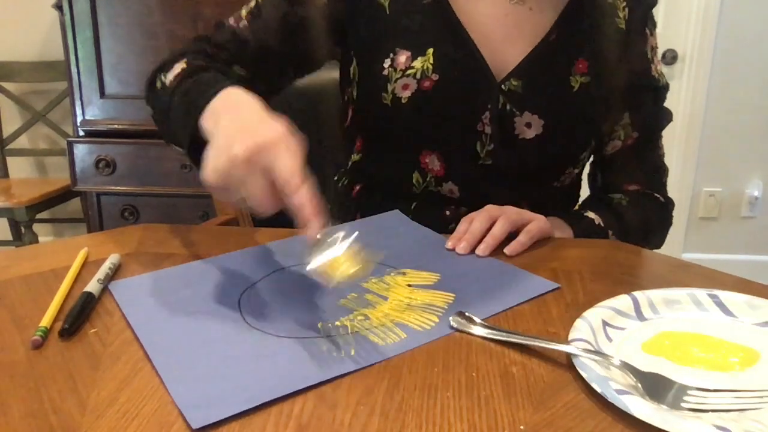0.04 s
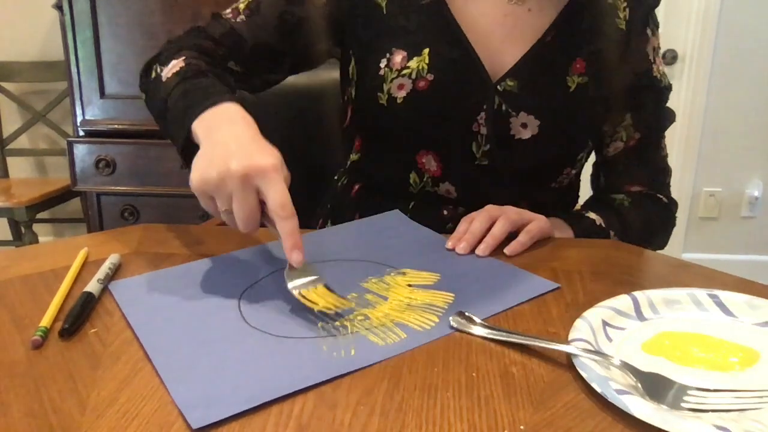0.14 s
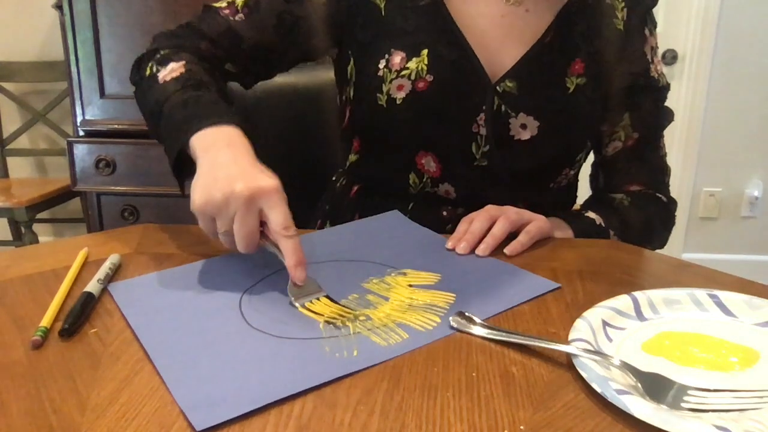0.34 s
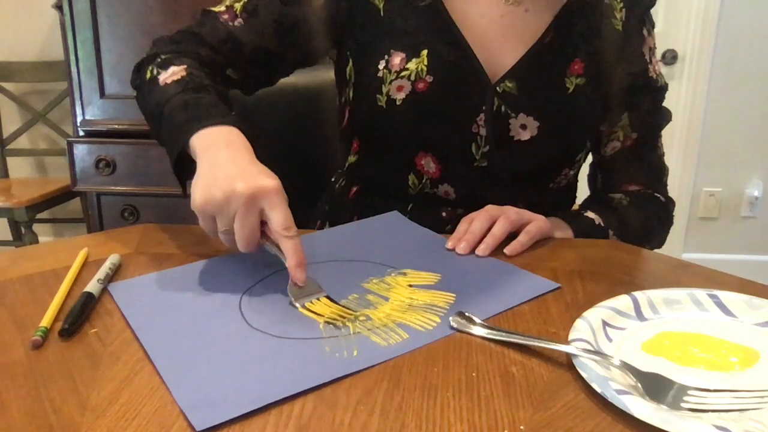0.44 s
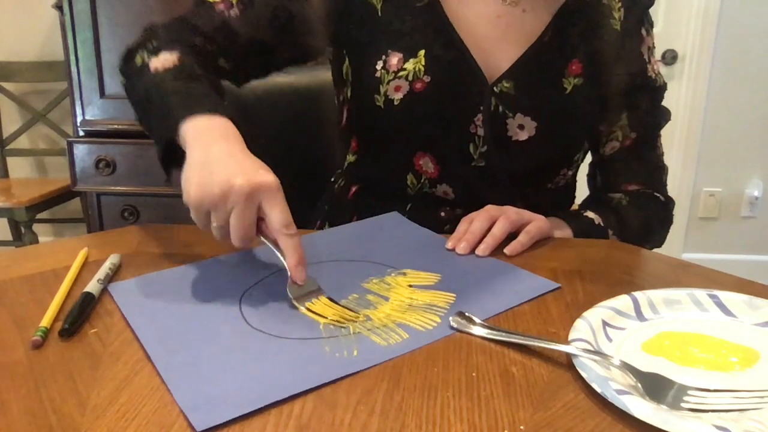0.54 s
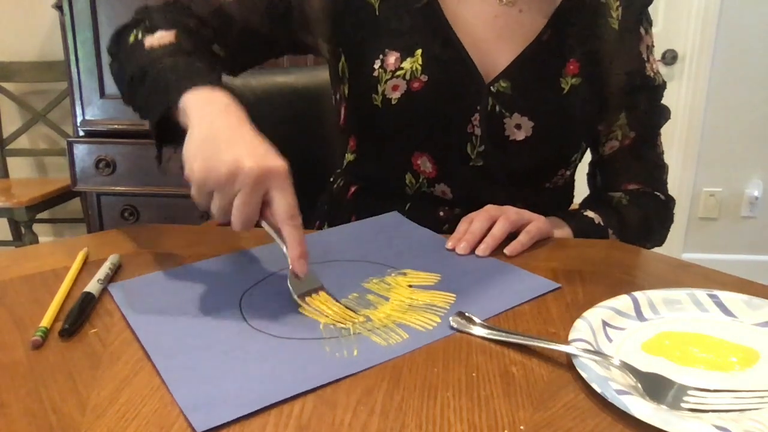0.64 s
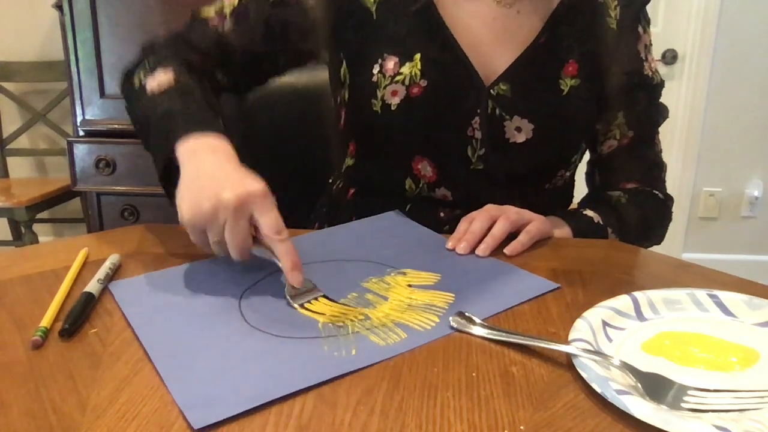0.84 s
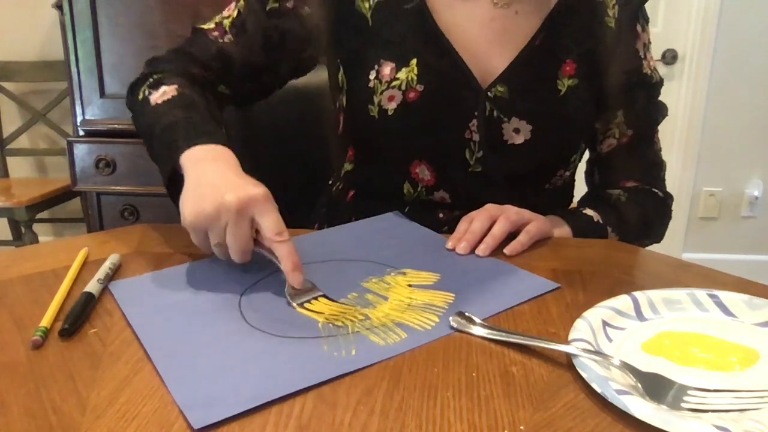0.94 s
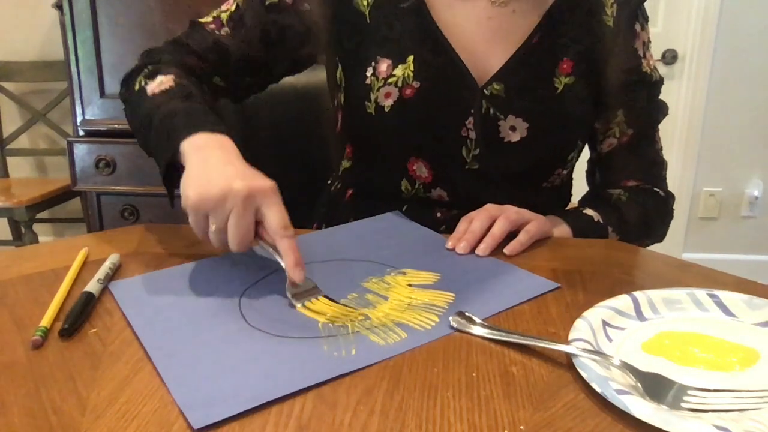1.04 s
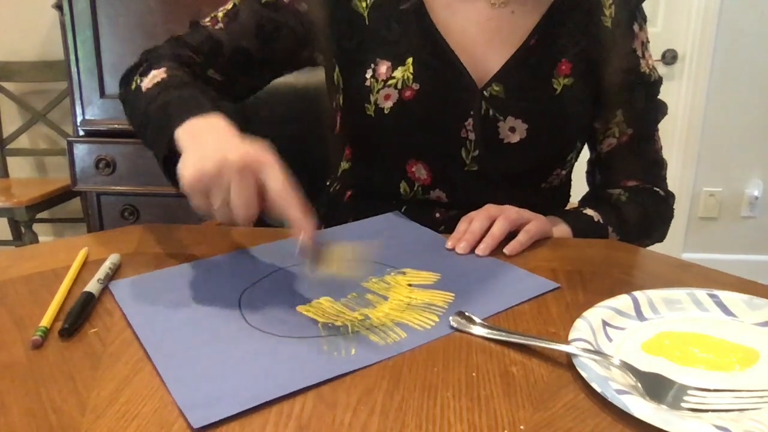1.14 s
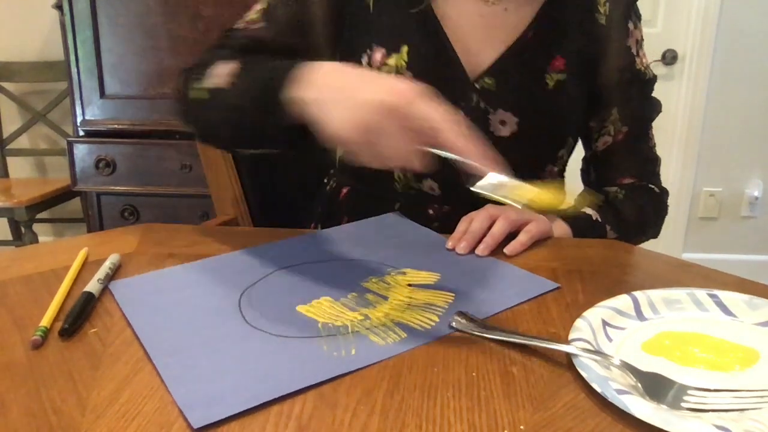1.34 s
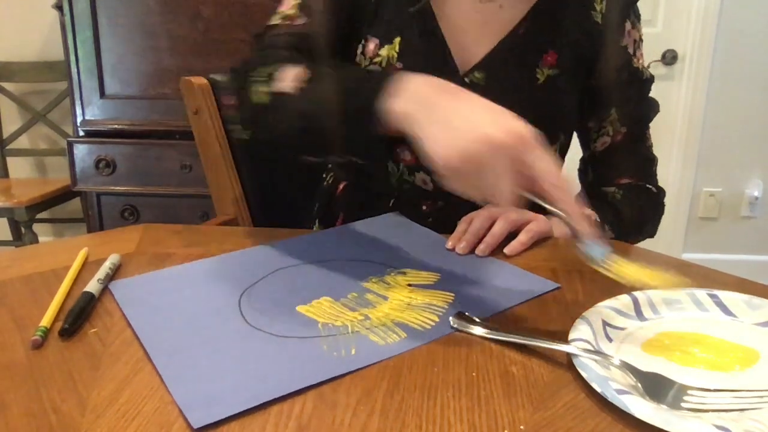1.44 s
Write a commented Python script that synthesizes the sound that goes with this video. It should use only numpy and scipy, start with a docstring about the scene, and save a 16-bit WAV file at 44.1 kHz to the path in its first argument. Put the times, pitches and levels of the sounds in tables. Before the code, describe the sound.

One dull knock sounds as a paint-covered fork is stamped onto paper on a wooden table, followed by very faint sticky crackles. It is heard up close in a small room with ventilation rumbling softly.

```python
"""A small room with a low ventilation rumble, one microphone close to a wooden table.
A fork loaded with paint is stamped once onto paper: fork and table top ring with a dull knock
and a weaker rebound. The fork is then rocked twice and lifted, and the wet paint and paper
crackle faintly under the tines. The near walls answer briefly."""
import sys
import numpy as np
from scipy import signal
from scipy.fft import rfft, irfft, next_fast_len
from scipy.io import wavfile

SR = 44100
rng = np.random.default_rng(int(sys.argv[2]) if len(sys.argv) > 2 else 0)


def generate_wav(sig):
    """Save sig (samples, or channels by samples) to the path in sys.argv[1] as 16-bit PCM at SR."""
    pcm = np.round(np.clip(np.atleast_2d(sig).T, -1, 1) * 32767).astype(np.int16)
    wavfile.write(sys.argv[1], SR, pcm)


N = 66150

# spectrum of the ventilation's rumble and air: f/Hz, level/dB
AIR_SPECTRUM = [(20, -18), (35, -11), (55, -1.5), (85, -2.5), (125, 4), (165, -0.5), (225, 0), (300, -3.5),
                (400, -6.5), (520, -13.5), (700, -15.5), (1050, -18.5), (1750, -25.5), (2300, -38),
                (2900, -42.5), (3800, -50.5), (9000, -51.5), (15000, -46)]
# spectrum of the faint upper hiss: f/Hz, level/dB
HISS_SPECTRUM = [(500, -38), (1400, -0.5), (2100, 1.5), (2600, -6.5), (3300, -23.5), (9000, -27),
                 (15000, -22)]
# that hiss comes and goes: t/s, level/dB
HISS_DRIFT = [(0, -85.5), (.2, -89.5), (.45, -88), (.8, -84.5), (1.0, -99.5), (1.3, -98.5), (1.45, -87)]
# decay of the room's tail: f/Hz, t60/s
ROOM_DECAY = [(100, 0.16), (500, 0.35), (2000, 0.42), (6000, 0.15), (15000, 0.18)]
# colour of that tail: f/Hz, gain/dB
TAIL_COLOUR = [(100, 6), (500, 1.5), (1200, 1), (1900, -8.5), (3500, 3.5), (15000, 0)]

# tines slipping over the paper: centre t/s, half-width/s, level/dB
TINE_SLIPS = [(0.821, 0.02, -70.5), (1.083, 0.019, -73.5)]
# spectrum of their scrape: f/Hz, level/dB
SCRAPE_SPECTRUM = [(100, -20), (420, 5), (1000, -9.5), (1800, -4), (2800, -19.5), (4200, -25),
                   (5200, -13.5), (6500, -25), (15000, -24)]
# spectrum of paint squeezed under the fork: f/Hz, level/dB
FIZZ_SPECTRUM = [(1000, -35), (8000, -24), (11500, -6), (15000, 2.5)]
# paint peeling as the fork moves: t/s, attack/s, hold/s, release t60/s, level/dB, tilt/(dB per octave)
PAINT_PEELS = [(0.578, 0.031, 0.042, 0.13, -70.5, 1.5), (0.785, 0.023, 0.056, 0.14, -74.5, 1),
               (1.057, 0.0062, 0.0098, 0.12, -64.5, 1.5)]
# spectrum of the crackle before the tilt: f/Hz, level/dB
CRACKLE_SPECTRUM = [(500, -28), (2000, -9), (3800, -16), (5000, -11.5), (8000, -2.5), (11000, 3),
                    (15000, 1)]
# single threads of paint snapping: t/s, level/dB
THREAD_SNAPS = [(.523, -67), (.593, -48), (0.5946, -59), (0.824, -57), (.907, -65), (1.064, -59.5),
                (1.077, -57)]
# spectrum of a snap: f/Hz, level/dB
SNAP_SPECTRUM = [(1000, -42), (5000, -24), (9000, 0), (13000, 9), (15500, 9)]

# spectrum of the tines meeting the paint just before the wood: f/Hz, level/dB
TOUCH_SPECTRUM = [(100, -20), (500, -20), (1100, -12), (1900, -1.5), (2500, -11.5), (3100, -33),
                  (5000, -49), (15000, -55)]
# spectrum of the paper under the blow: f/Hz, level/dB
SCUFF_SPECTRUM = [(300, -10), (2000, 12.5), (4000, -14), (8000, -18.5), (15000, -14.5)]
# the fork's blow and rebound: t/s, level/dB, contact time/s
FORK_BLOWS = [(0.2196, 1, 0.00048), (0.2307, -8.5, 0.0011)]
# modes of fork and table top, damped by hand and paper: f/Hz, relative level/dB, t60/s
KNOCK_MODES = [(162.3, -28.5, 0.046), (248, -27.5, 0.046), (346, -32.5, 0.021), (431, -23.5, 0.014),
               (722, -40, 0.039), (832, -39, 0.023), (946, -39, 0.023), (1385, -51, 0.02),
               (1506, -35, 0.014), (1810, -25, 0.014), (2030, -39.5, 0.024), (2390, -44, 0.018)]
# how well the cushioned table top radiates: f/Hz, gain/dB
TOP_RADIATION = [(30, -27.5), (104, -29.5), (132, -0.5), (600, 3), (1020, 1.5), (1130, -11), (1330, 1),
                 (1420, -11), (1520, 3.5), (2100, 1), (2600, -4), (2900, -19), (3500, -4), (5000, -32.5),
                 (15000, -52)]
# long ring of the whole table: f/Hz, relative peak level/dB, t60/s, build-up/s
TABLE_MODES = [(47, -51, .14, .08), (231, -43, 0.15, 0.029), (273.7, -51, 0.082, 0.055),
               (506.6, -59.5, 0.067, .015), (529.3, -60, 0.17, 0.069)]


def amp(db):
    return 10 ** (np.asarray(db) / 20)


def unit(x):
    return x / np.sqrt(np.mean(x ** 2) + 1e-20)


def along(points, hz):
    """Read (f/Hz, value) points on a log frequency axis."""
    freqs, values = np.transpose(points)
    return np.interp(np.log(hz + 1), np.log(freqs + 1), values)


def since(start):
    """Seconds after a moment, for each sample."""
    return np.arange(N) / SR - start


def fade(t, t60):
    """Exponential decay from t = 0, silent before."""
    return (t >= 0) * np.exp(-np.log(1000) * np.maximum(t, 0) / t60)


def swell(centre_s, half_width_s, db):
    """A bell-shaped rise and fall."""
    return amp(db) * np.exp(-(since(centre_s) / half_width_s) ** 2)


def mode(hz, db, t60):
    """One damped vibration."""
    t = since(0)
    return amp(db) * fade(t, t60) * np.sin(2 * np.pi * hz * t)


def filtered(x, response):
    """Multiply the spectrum of x by a function of frequency."""
    size = next_fast_len(N + SR // 2)
    return irfft(rfft(x, size) * response(np.fft.rfftfreq(size, 1 / SR)), size)[:N]


def coloured(x, gains):
    """A causal, minimum-phase filter through (f/Hz, gain/dB) points."""
    size = next_fast_len(N + SR // 2)
    gain = amp(along(gains, np.fft.rfftfreq(size, 1 / SR)))
    cepstrum = irfft(np.log(gain), size)
    cepstrum[1:] *= 2 * (np.arange(1, size) < size // 2)
    return filtered(x, lambda hz: np.exp(rfft(cepstrum)))


def noise(spectrum):
    """Coloured noise of rms 1."""
    return unit(filtered(rng.standard_normal(N), lambda hz: amp(along(spectrum, hz))))


def band(hz, width_hz):
    """Narrow noise of rms 1 around one frequency."""
    return unit(filtered(rng.standard_normal(N), lambda f: np.exp(-((f - hz) / width_hz) ** 2)))


def ventilation(air_db=-63, hum_db=-69.5):
    """Room tone: steady rumble and air, with an unsteady low hum and a drifting upper hiss."""
    hiss_db = np.interp(since(0), *np.transpose(HISS_DRIFT))
    hiss = amp(hiss_db) * noise(HISS_SPECTRUM)
    air = amp(air_db) * noise(AIR_SPECTRUM)
    hum = amp(hum_db) * band(hz=61, width_hz=2.2)
    return air + hum + hiss


def room(direct, tail_db, walls_db=-23.5, first_s=0.004, spread_s=0.016, echoes=10):
    """The direct sound reaches the microphone first, then the near walls and a short diffuse tail."""
    hz, t, spectra = signal.stft(rng.standard_normal(SR // 2), SR, nperseg=256)
    colour = amp(along(TAIL_COLOUR, hz))[:, None]
    decay = fade(t, along(ROOM_DECAY, hz)[:, None])
    tail = signal.istft(spectra * colour * decay, SR, nperseg=256)[1]
    tail *= np.clip(np.arange(len(tail)) / SR / first_s - 1, 0, 1)  # fades in after first_s
    response = amp(tail_db) * tail / np.linalg.norm(tail)
    for lateness, polarity in rng.random((echoes, 2)):
        delay = int((first_s + lateness * spread_s) * SR)
        response[delay] += amp(walls_db) * np.sign(polarity - 0.5) / np.sqrt(echoes)
    return direct + signal.fftconvolve(direct, response)[:N]


def tines(zing_db=-77, lift_s=1.066):
    """The pressed fork squeezes the paint, scrapes briefly when it slips and zings as it is lifted."""
    scrape = noise(SCRAPE_SPECTRUM) * sum(swell(*slip) for slip in TINE_SLIPS)
    fizz = noise(FIZZ_SPECTRUM) * swell(centre_s=0.74, half_width_s=0.19, db=-91)
    zing = amp(zing_db) * fade(since(lift_s), t60=0.12) * band(hz=5200, width_hz=380)
    return scrape + fizz + zing


def paint(pops_per_s=1100, spread_db=3.5, hiss_db=-5):
    """Dense tiny pops while the tines peel from the paint, with a few louder snaps of single threads."""
    peeling = np.zeros(N)
    for start, attack, hold, release, db, tilt_db in PAINT_PEELS:
        pops = (rng.random(N) < pops_per_s / SR) * rng.choice([-1, 1], N)
        pops = pops * amp(spread_db * rng.standard_normal(N))
        source = unit(pops) + amp(hiss_db) * rng.standard_normal(N)
        crackle = filtered(source, lambda hz: amp(along(CRACKLE_SPECTRUM, hz) + tilt_db * np.log2(hz + 1)))
        t = since(start)
        envelope = np.clip(t / attack, 0, 1) * fade(np.maximum(t - attack - hold, 0), release)
        peeling += amp(db) * envelope * unit(crackle)
    snap_envelope = sum(amp(db) * fade(since(start), t60=0.006) for start, db in THREAD_SNAPS)
    return peeling + snap_envelope * noise(SNAP_SPECTRUM)


def paper(touch_db=-37.5, touch_s=0.0013, scuff_db=-62.5, slap_boost_db=3):
    """A soft touch leads into the blow, and the sheet slaps and rustles after it."""
    t = since(FORK_BLOWS[0][0])
    touch = amp(touch_db) * np.exp(-np.abs(t) / touch_s) * noise(TOUCH_SPECTRUM)
    slap = amp(slap_boost_db) * fade(t, t60=0.02)
    rustle = fade(t, t60=0.25)
    return touch + amp(scuff_db) * (slap + rustle) * noise(SCUFF_SPECTRUM)


def knock():
    """Each contact is a short push, cushioned by the paper, that rings fork and table."""
    force = np.zeros(N)
    for start, db, contact_s in FORK_BLOWS:
        progress = np.maximum(since(start), 0) / contact_s
        push = progress * np.exp(-2 * np.pi * progress)
        force += amp(db) * push / push.sum()
    body = coloured(sum(mode(*row) for row in KNOCK_MODES), TOP_RADIATION)
    for hz, db, t60, build_up_s in TABLE_MODES:
        ring = mode(hz, 0, t60) * (1 - np.exp(-since(0) / build_up_s)) ** 2
        body += amp(db) * ring / np.abs(ring).max()
    return -signal.fftconvolve(force, body)[:N]


def scene():
    """At the table, in mono: the stamp and the faint peeling over the room tone."""
    stamp = room(knock() + paper(), tail_db=-17.5)
    peeling = room(paint() + tines(), tail_db=-9.5)
    return (stamp + peeling + ventilation())[None]


def record(dry):
    """The microphone passes nothing above 16 kHz."""
    return filtered(dry[0], lambda hz: hz < 16000)[None]


dry = scene()
out = record(dry)
generate_wav(out)
```